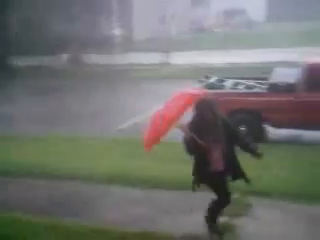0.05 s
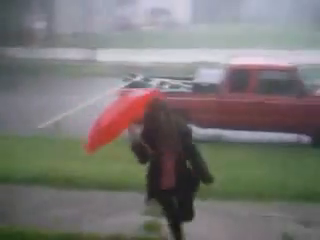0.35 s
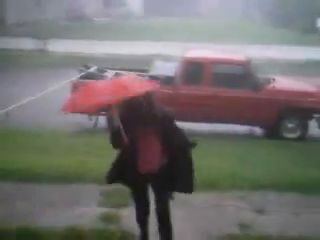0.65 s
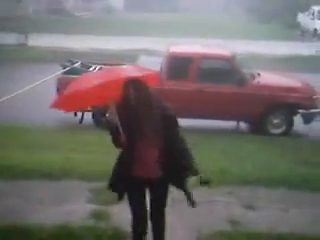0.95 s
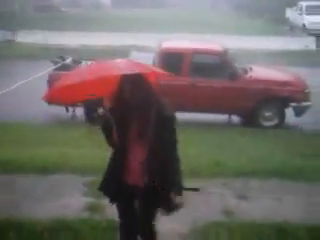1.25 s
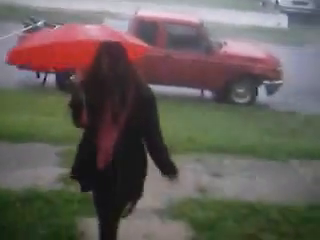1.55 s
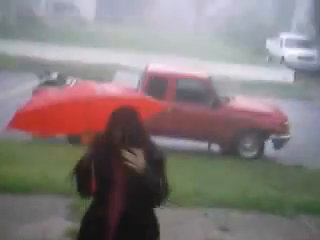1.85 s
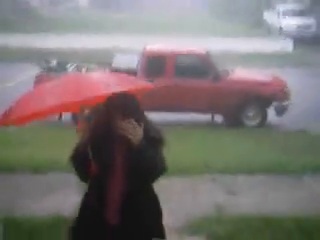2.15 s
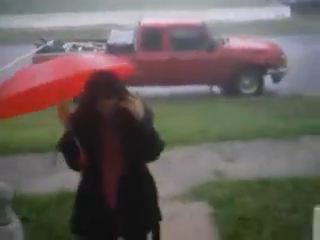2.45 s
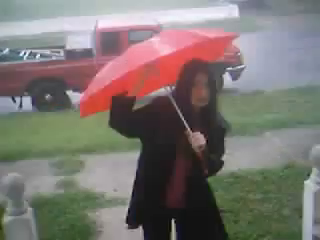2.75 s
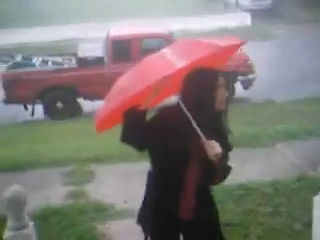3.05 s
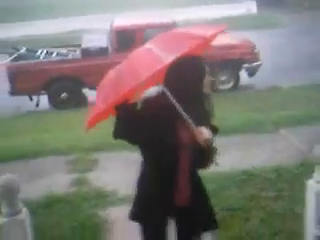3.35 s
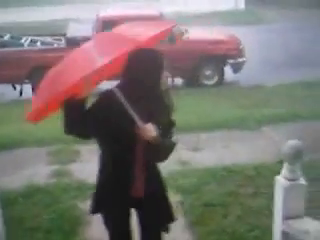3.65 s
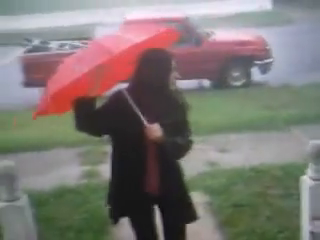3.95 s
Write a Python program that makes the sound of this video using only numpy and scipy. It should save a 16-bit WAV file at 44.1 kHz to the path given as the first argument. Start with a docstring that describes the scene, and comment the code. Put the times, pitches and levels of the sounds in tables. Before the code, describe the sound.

A steady downpour, heard through a muffled microphone on a front path, mixes a distant roar with nearby patter. Low wind gusts buffet the microphone early on, and later a brief dropout ends in a click before the rain continues.

```python
"""Downpour on a windy street

Heavy rain and gusty wind, heard from a front path through a small, dull camera microphone. The rain roars in
the distance, grainy with an even patter, while fine splashes tick close by, each drop a brief damped ring. Wind
rushes along the street and bumps the microphone. Late on, the sound cuts out for an instant and comes back with
a click."""
import sys
import numpy as np
from scipy import signal
from scipy.fft import rfft, irfft, next_fast_len
from scipy.io import wavfile
from scipy.ndimage import uniform_filter1d, map_coordinates

SR = 44100
rng = np.random.default_rng(int(sys.argv[2]) if len(sys.argv) > 2 else 0)


def bounce(signal):
    """Save signal as a 16-bit WAV file at the path given by the first command-line argument."""
    frames = np.transpose(np.atleast_2d(signal))
    limited = np.clip(frames, -1, 1)
    pcm = np.round(limited * 32767).astype(np.int16)
    wavfile.write(sys.argv[1], SR, pcm)


N = 176400
MIC_HZ = 5000  # top of the microphone's range


def downpour():
    """Distant rain merges into a roar that swells and falls, grainy with a dense, even patter of drops."""
    # Strength of the downpour: time_s, level_db
    strength = [(0, -25), (.16, -25.5), (.25, -24), (.31, -21), (.4, -23.5), (.5, -25), (.61, -23),
                (.7, -24), (.78, -23.5), (.84, -26.5), (.93, -22.5), (1.06, -23), (1.36, -21.5),
                (1.53, -21), (1.65, -20.5), (1.84, -22.5), (1.97, -21.5), (2.27, -23), (2.34, -24.5),
                (2.56, -22), (2.72, -22), (2.9, -24), (3.35, -24.5), (3.57, -25.5), (3.7, -24.5), (4, -25)]
    # Spectrum of roar and patter: frequency_hz, level_db
    spectrum = [(100, -25.5), (300, -16), (550, -5.5), (690, -3.5), (820, -0.33), (950, -1.83),
                (1090, -0.84), (1300, -6), (1550, -11), (1900, -19.5), (2400, -30), (4000, -50),
                (5000, -67.5)]
    roar = amp(-3 + 0.26 * wobble(rate_hz=15)) * rush(spectrum, patchy_db=0.5)
    drops = shower(count=2000, pitch_hz=970, spread=0.38, cycles=7.1, size_db=4.0)
    patter = amp(-10.5) * coloured(drops, spectrum)
    return amp(curve(strength)) * (roar + patter)


def wind():
    """Wind along the street: a low rush that rises and falls with the gusts."""
    # Strength of the wind: time_s, level_db
    strength = [(0, -26.5), (.14, -31), (.37, -30), (.65, -29), (.87, -32), (1.05, -28), (1.4, -27),
                (1.58, -29), (2.3, -28.5), (2.53, -26.5), (2.7, -31), (3.1, -32.5), (3.45, -30), (4, -30)]
    # Spectrum of the rush: frequency_hz, level_db
    spectrum = [(20, -20), (55, -8), (98, -9.5), (122, -4), (150, -5), (240, -2), (320, 1), (390, 0.5),
                (490, -1), (620, -5.5), (900, -12), (2000, -38), (4000, -69)]
    return amp(curve(strength) + 0.36 * wobble(rate_hz=7.6)) * rush(spectrum, patchy_db=1)


def wind_bumps():
    """Gusts strike the microphone, each a soft, bell-shaped swell of rumble."""
    # Gusts on the microphone: peak_s, level_db, half_width_s
    gusts = [(0.007, -27, 0.029), (0.204, -33, 0.055), (0.379, -33, 0.026), (0.771, -33.5, 0.027),
             (1.021, -29, 0.02), (1.345, -36.5, 0.03), (1.55, -36, 0.015)]
    # Spectrum of the rumble: frequency_hz, level_db
    spectrum = [(15, -20.5), (35, -8.5), (55, -3.5), (80, -5.5), (130, -10.5), (300, -23.5), (1000, -65)]
    t = np.arange(N) / SR
    swells = sum(amp(db) * np.exp(-.5 * ((t - peak_s) / width_s) ** 2) for peak_s, db, width_s in gusts)
    return swells * rush(spectrum, patchy_db=0)


def spray():
    """Fine splashes tick near the microphone and blur into a hiss farther off."""
    # Strength of the spray: time_s, level_db
    strength = [(0, -40), (.7, -40), (.84, -41.5), (1.1, -38.5), (1.3, -38.8), (1.5, -37), (1.8, -38),
                (2.2, -39), (2.42, -40), (2.63, -39), (2.95, -42), (3.4, -40.5), (3.5, -38.5), (3.7, -41.5),
                (4, -41.5)]
    # Spectrum of splashes and hiss: frequency_hz, level_db
    spectrum = [(1000, -14), (1900, -2.5), (2300, -3), (2750, 3), (3150, -1), (3900, -7.5), (4400, -16),
                (4900, -31.5)]
    drops = shower(count=6000, pitch_hz=3160, spread=.3, cycles=2.1, size_db=4.0)
    splashes = amp(-4.5) * coloured(drops, spectrum)
    hiss = amp(-2.5) * rush(spectrum, patchy_db=0.9)
    return amp(curve(strength)) * (splashes + hiss)


def shower(count, pitch_hz, spread, cycles, size_db):
    """Drops land at random; each rings at its own pitch and size, dying by 60 dB over `cycles`."""
    moment, size_draw = np.hsplit(rng.random((count, 2)), 2)
    hz = np.minimum(pitch_hz * np.exp(spread * rng.standard_normal((count, 1))), MIC_HZ)
    size = amp(size_db * np.minimum(-np.log(1 - size_draw), np.pi))  # many small drops, few large
    age = np.arange(SR // 100)  # 10 ms of samples
    turns = hz * age / SR
    rings = size * np.sin(2 * np.pi * turns) * np.exp(-np.log(1000) * turns / cycles)
    positions = (moment * N).astype(int) + age
    return np.bincount(positions.ravel(), rings.ravel(), N)[:N]


def rush(spectrum, patchy_db):
    """Coloured noise whose level flickers in patches of time and frequency."""
    noise = signal.stft(rng.standard_normal(N), nperseg=512)[2]
    patches = uniform_filter1d(rng.standard_normal(noise.shape), size=5, axis=0)
    patches = uniform_filter1d(patches, size=14, axis=1)
    flickering = signal.istft(noise * amp(patchy_db * unit(patches)), nperseg=512)[1][:N]
    return coloured(flickering, spectrum)


def coloured(x, spectrum):
    """x shaped by (frequency_hz, level_db) points, at rms 1."""
    points_hz, db = np.transpose(spectrum)
    return unit(filtered(x, lambda hz: amp(np.interp(np.log(hz + 1), np.log(points_hz), db))))


def filtered(x, response):
    """x through a gain given as a function of frequency."""
    size = next_fast_len(N + 8192)
    return irfft(rfft(x, size) * response(np.fft.rfftfreq(size, 1 / SR)), size)[:N]


def wobble(rate_hz):
    """A smooth random curve with rate_hz knots a second."""
    return map_coordinates(rng.standard_normal(400), [np.arange(N) * rate_hz / SR], mode="wrap")


def curve(rows):
    """(time_s, value) points as one value per sample."""
    return np.interp(np.arange(N) / SR, *np.transpose(rows))


def amp(db):
    """Decibels to gain."""
    return 10 ** (np.asarray(db) / 20)


def unit(x):
    """Scale to rms 1."""
    return x / np.sqrt(np.mean(x ** 2) + 1e-20)


def scene():
    """Rain and wind reach one microphone on the front path."""
    return (downpour() + wind() + wind_bumps() + spray())[None]


def record(dry):
    """A dull microphone whose input cuts out abruptly, then returns with a click and a soft thump."""
    stop_s, resume_s = 2.8075, 2.8826
    click_decay_s, thump_decay_s = 0.001, 2.5
    offset = 0.015  # resting level of the input
    fade_s, top_hz = .001, 16300
    t = np.arange(N) / SR
    dull = filtered(dry[0], lambda hz: 1 / np.sqrt(1 + (hz / MIC_HZ) ** 100))
    live = (t < stop_s) | (t >= resume_s)
    since_s = np.abs(t - resume_s)
    click = 0.049 * np.exp(-since_s / click_decay_s)
    thump = 0.012 * np.exp(-since_s / thump_decay_s)  # the resting level jumps, then settles
    interrupted = live * (dull + offset) + (t >= resume_s) * (click + thump)
    fade = np.minimum(np.minimum(t, t[-1] - t) / fade_s, 1)
    return filtered(fade * interrupted, lambda hz: 1 / np.sqrt(1 + (hz / top_hz) ** 80))[None]


dry = scene()
out = record(dry)
bounce(out)
```